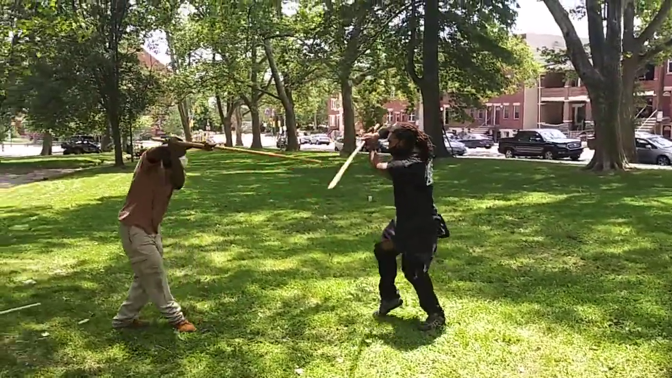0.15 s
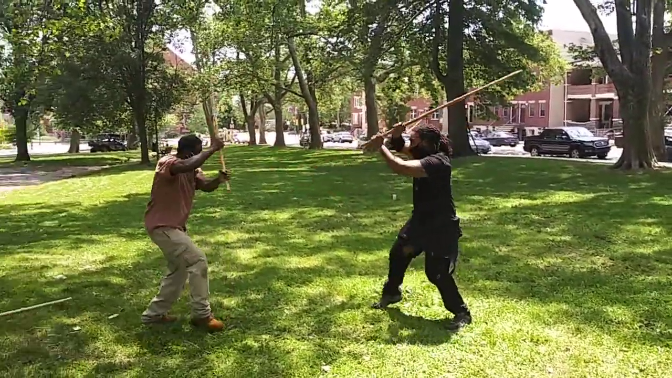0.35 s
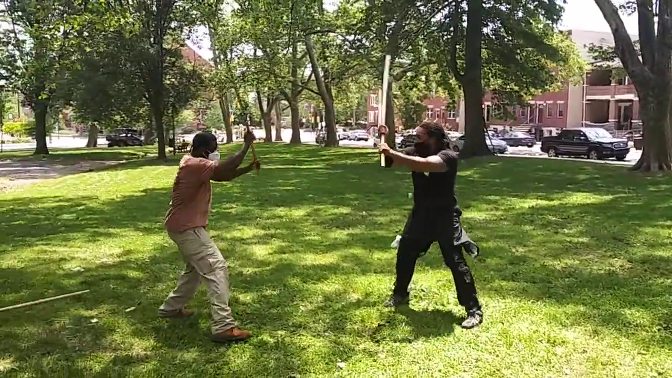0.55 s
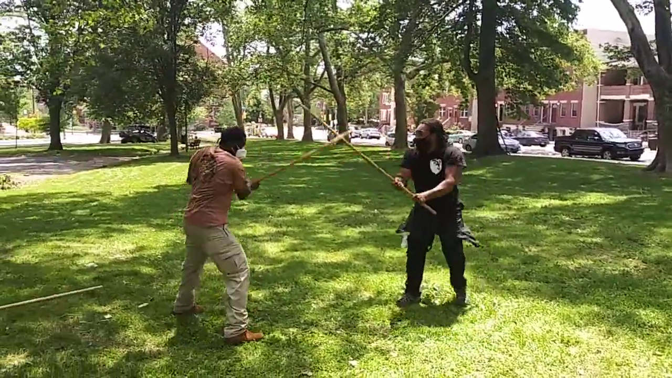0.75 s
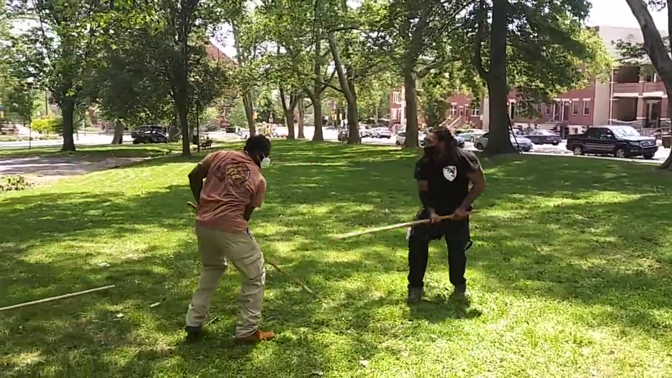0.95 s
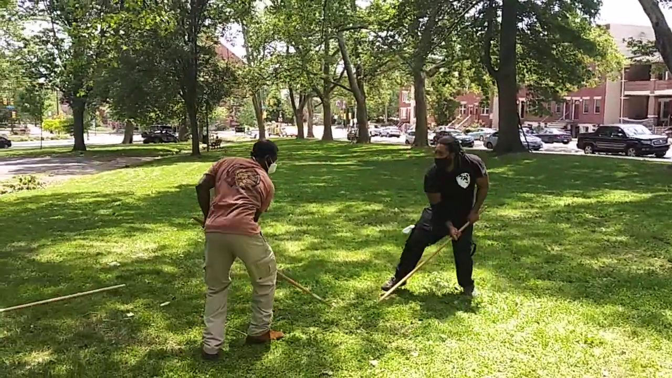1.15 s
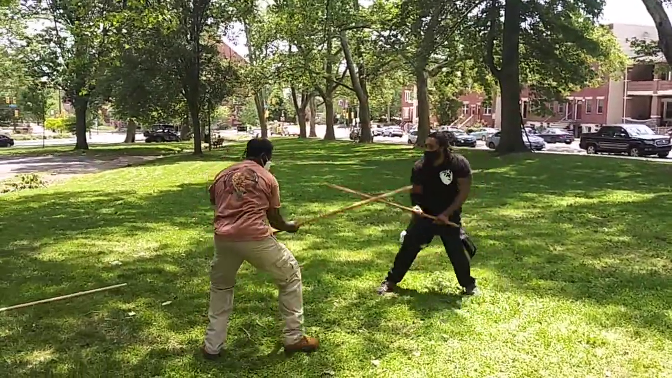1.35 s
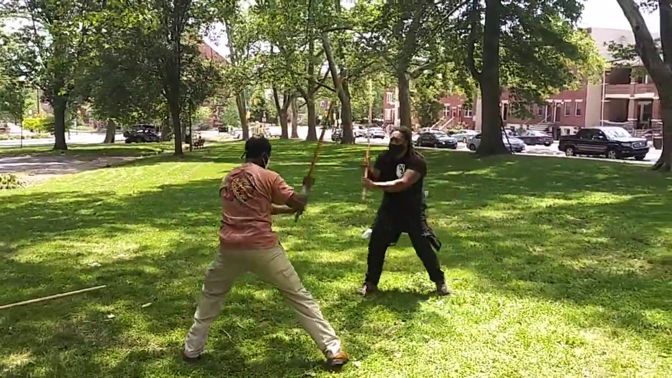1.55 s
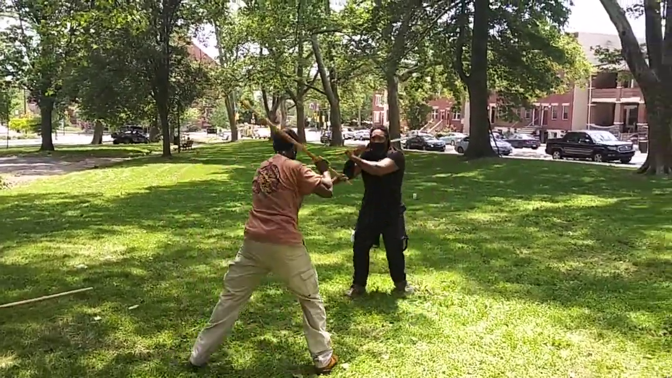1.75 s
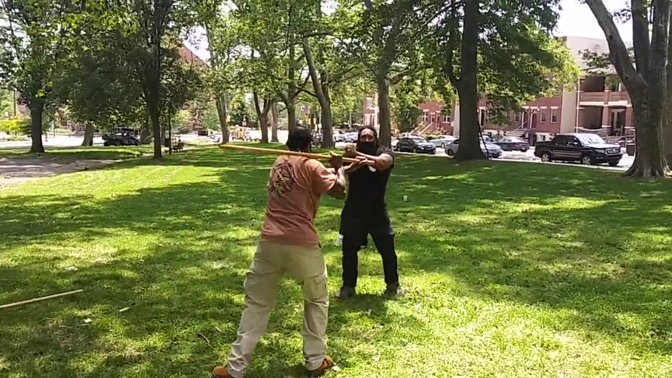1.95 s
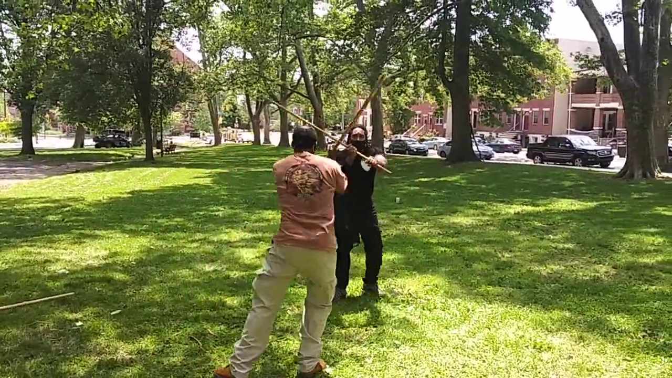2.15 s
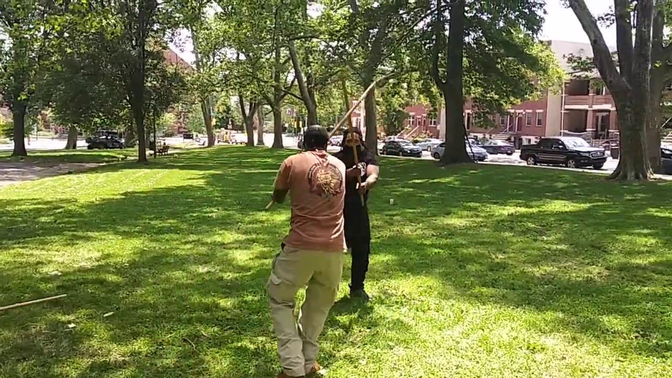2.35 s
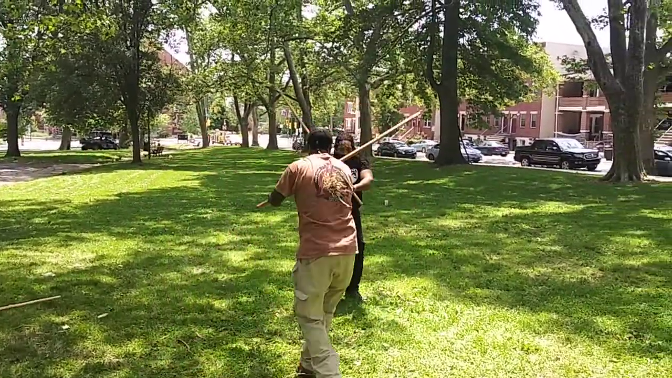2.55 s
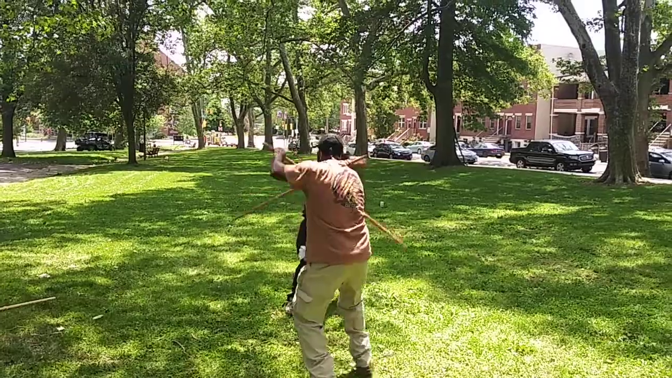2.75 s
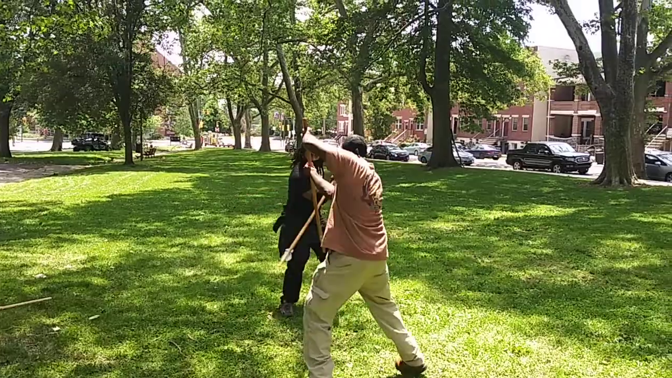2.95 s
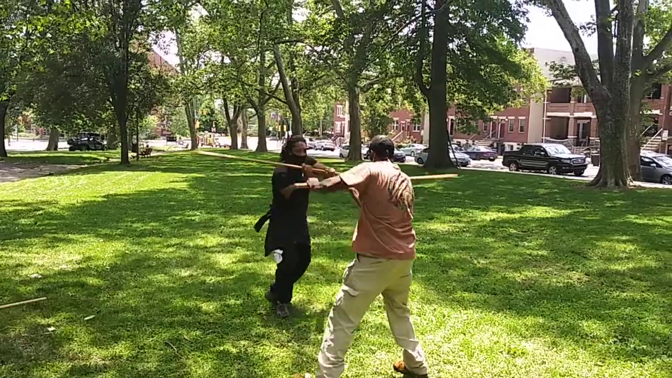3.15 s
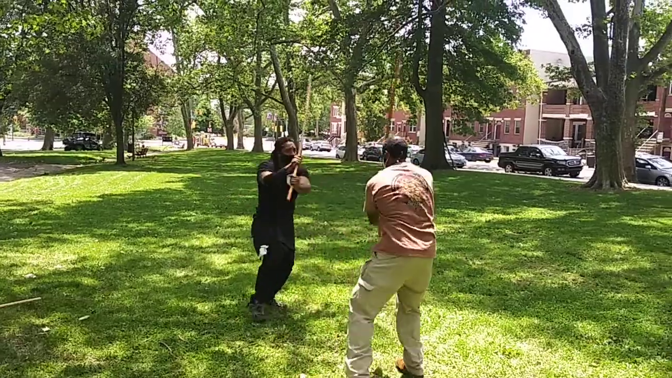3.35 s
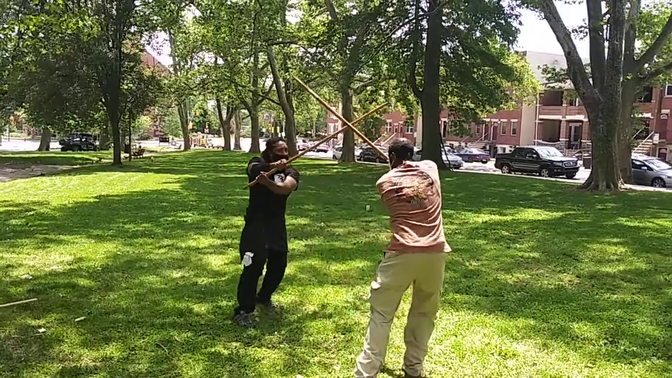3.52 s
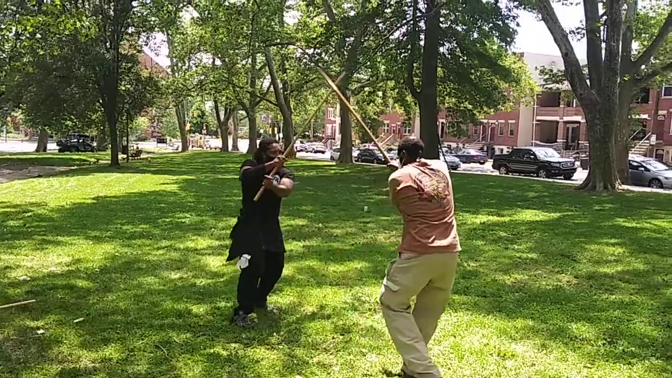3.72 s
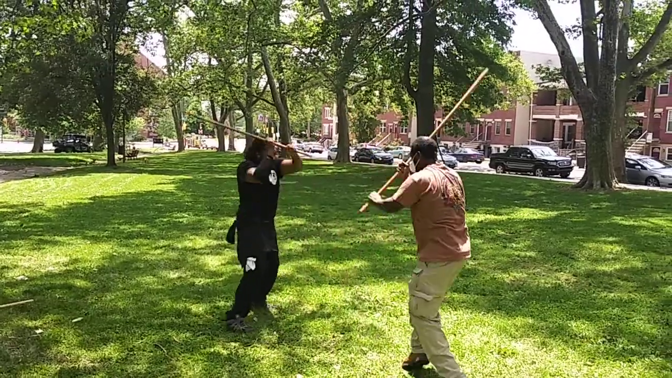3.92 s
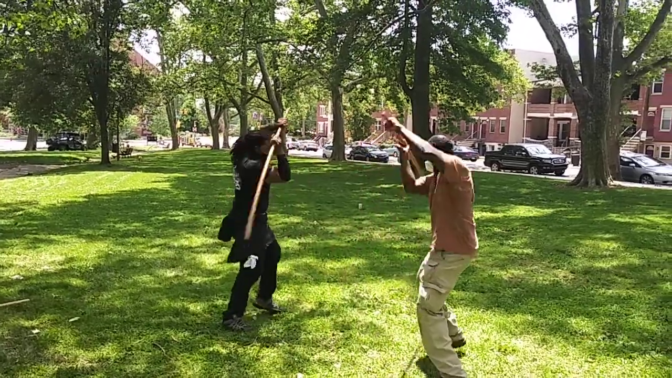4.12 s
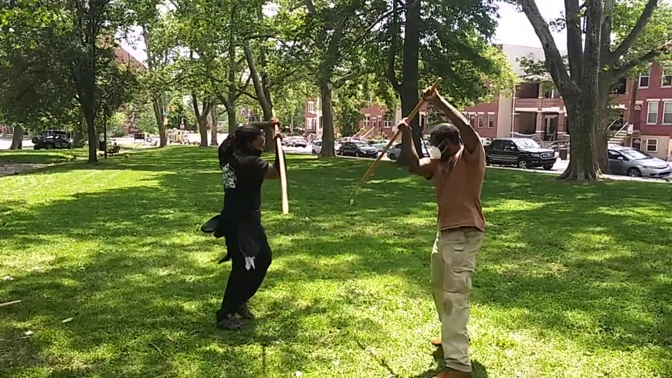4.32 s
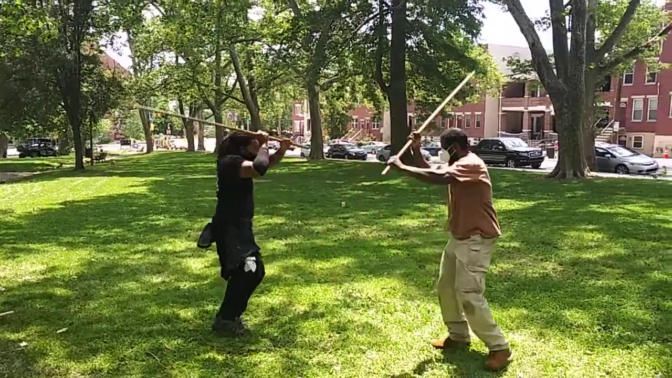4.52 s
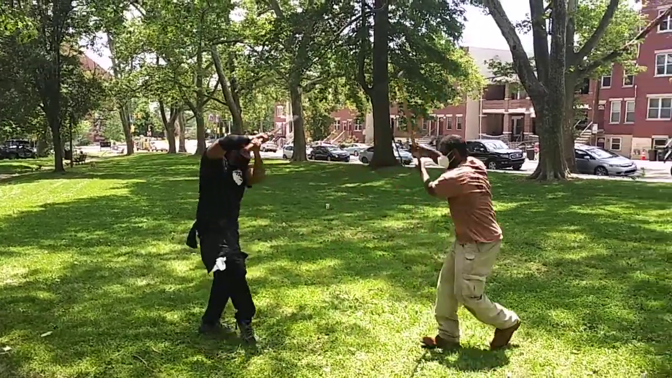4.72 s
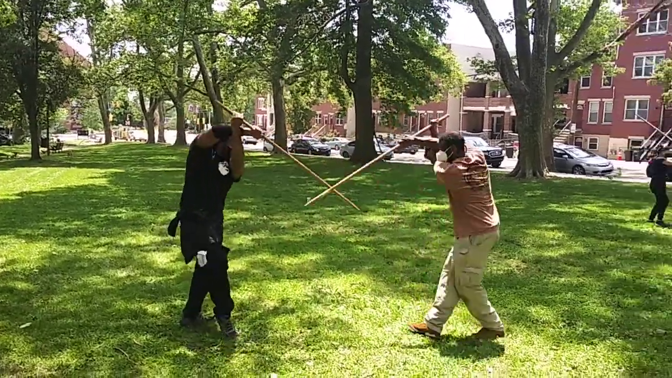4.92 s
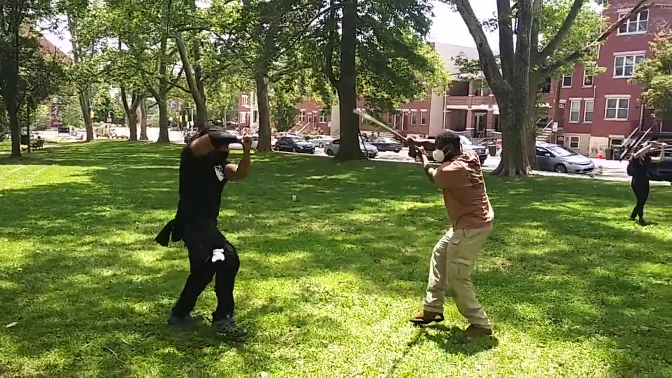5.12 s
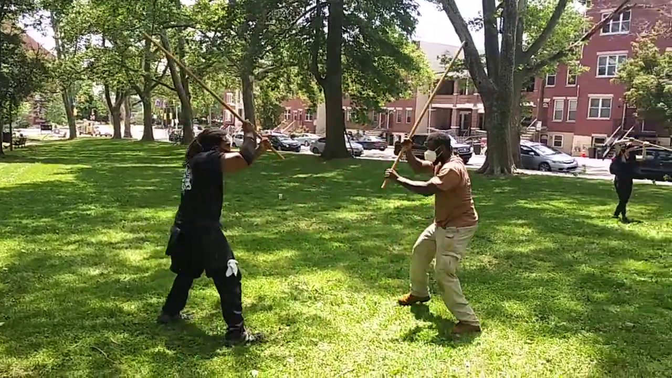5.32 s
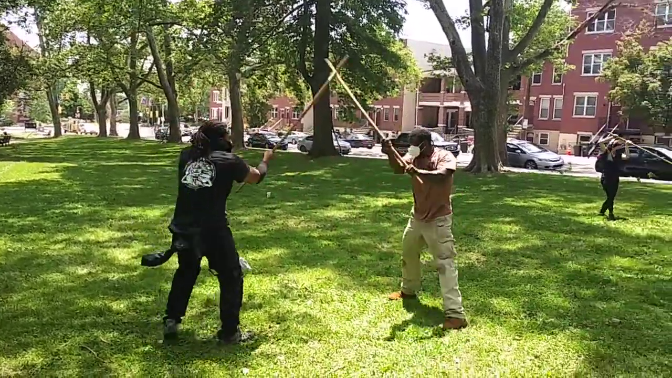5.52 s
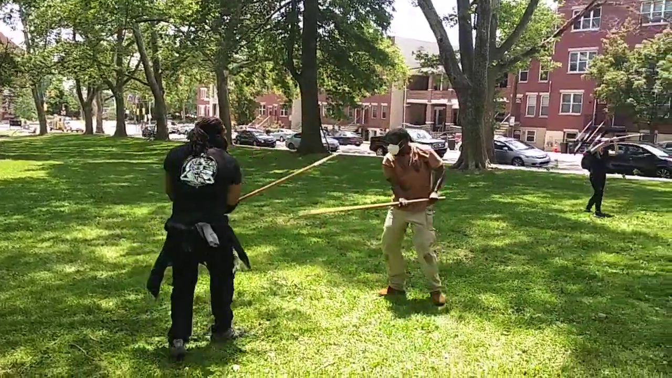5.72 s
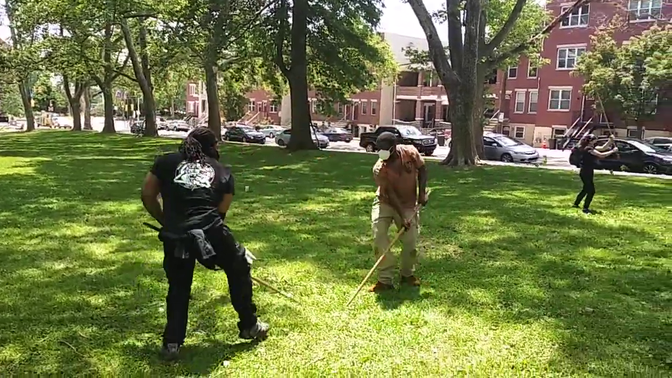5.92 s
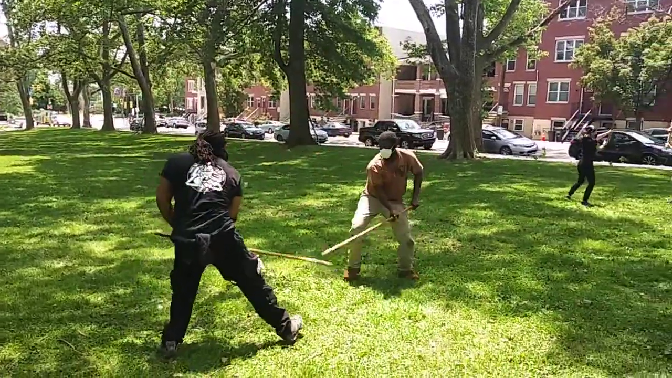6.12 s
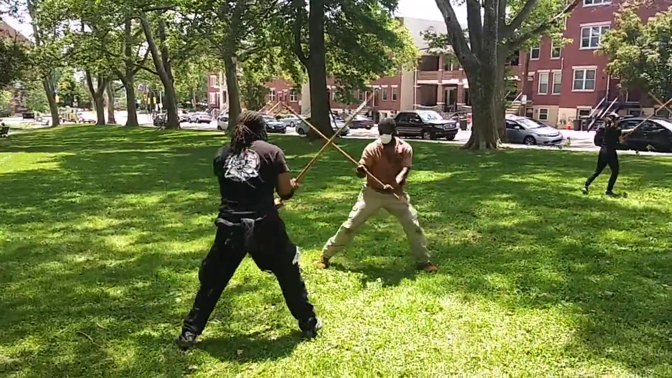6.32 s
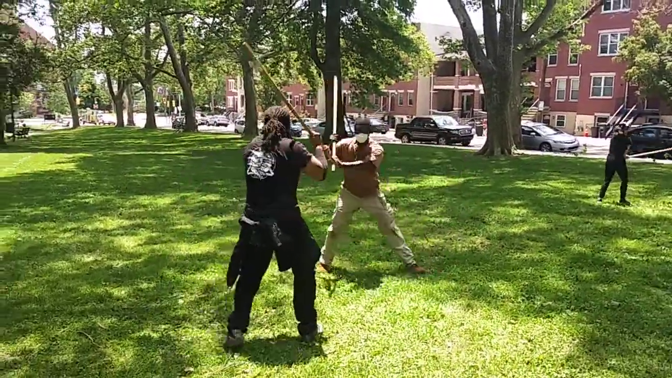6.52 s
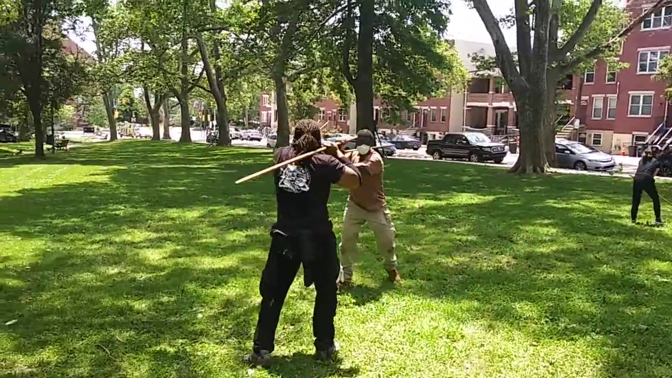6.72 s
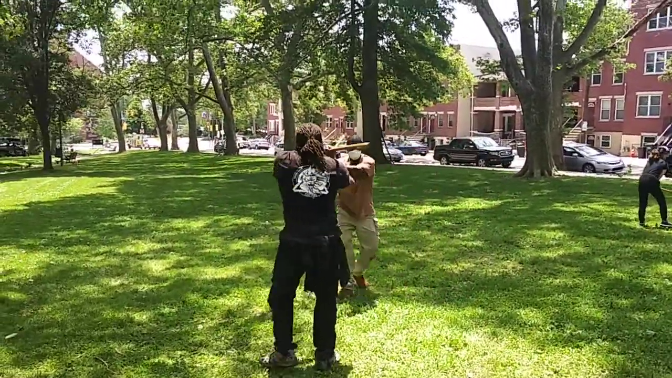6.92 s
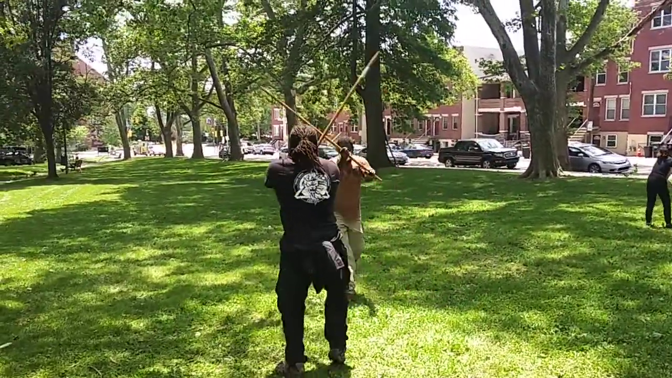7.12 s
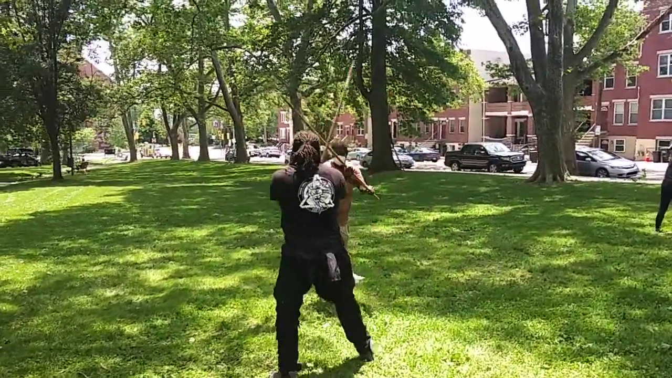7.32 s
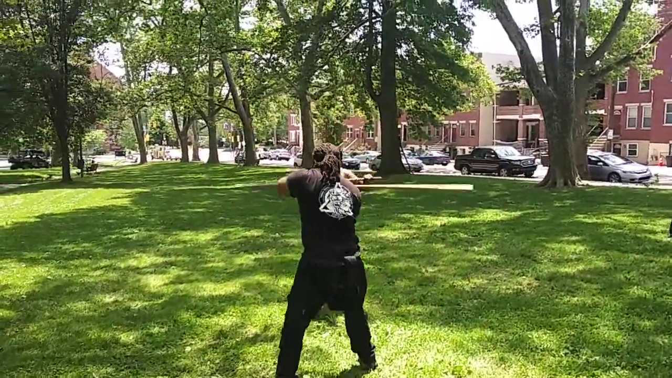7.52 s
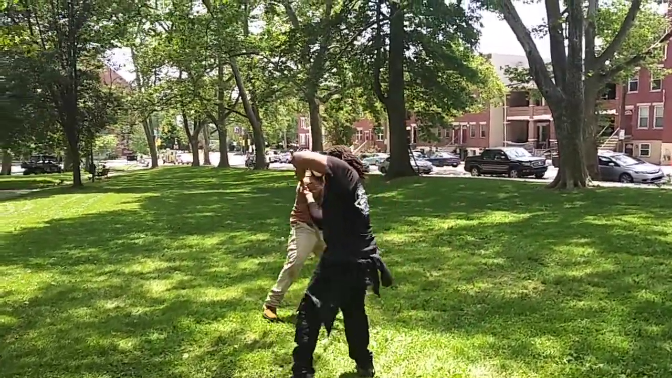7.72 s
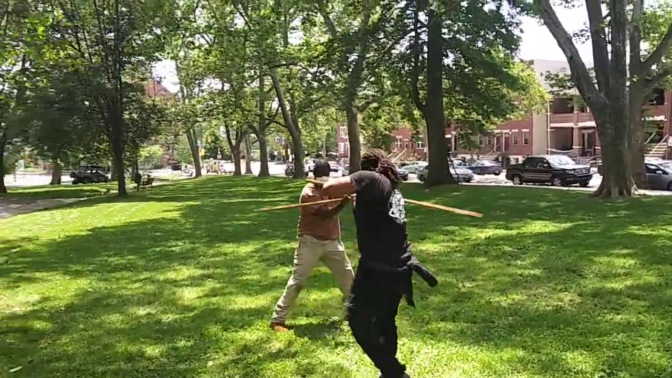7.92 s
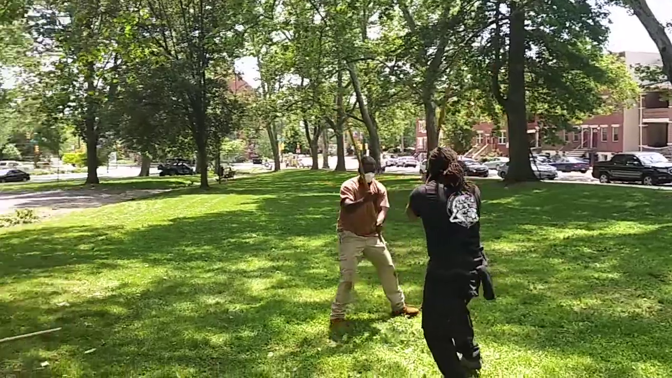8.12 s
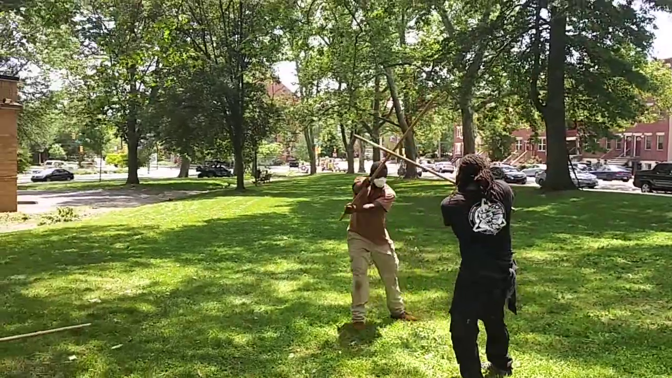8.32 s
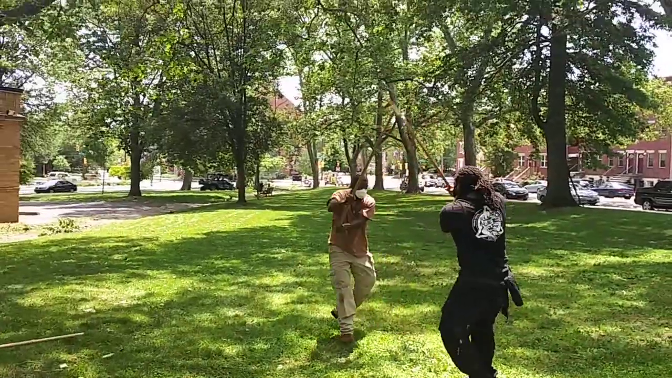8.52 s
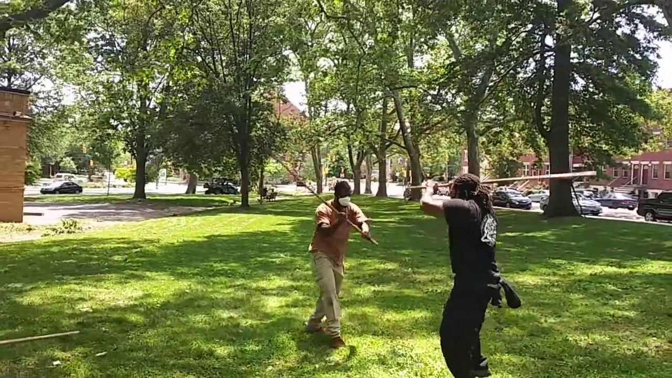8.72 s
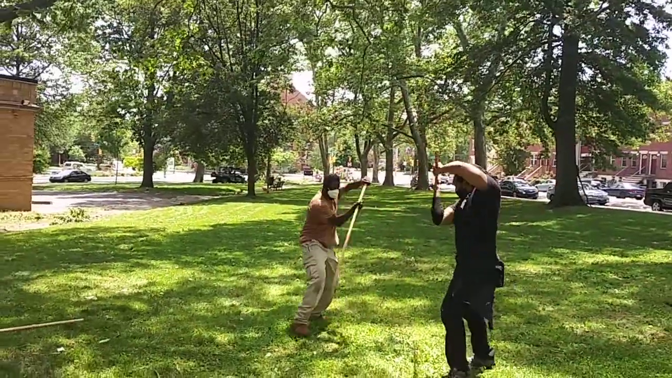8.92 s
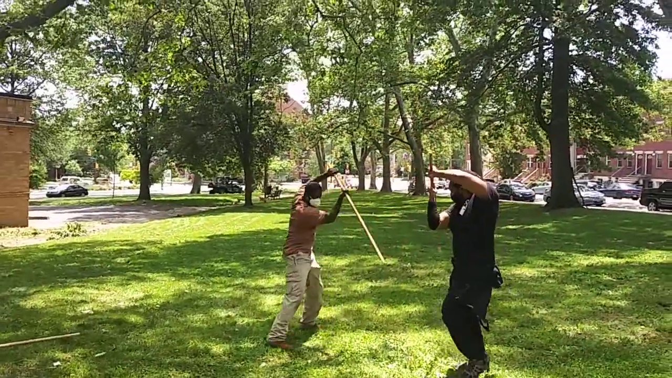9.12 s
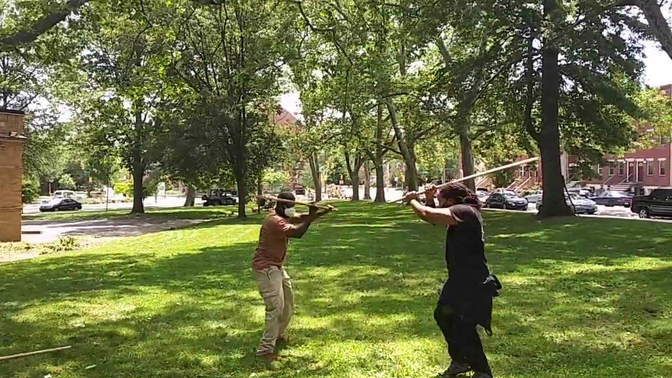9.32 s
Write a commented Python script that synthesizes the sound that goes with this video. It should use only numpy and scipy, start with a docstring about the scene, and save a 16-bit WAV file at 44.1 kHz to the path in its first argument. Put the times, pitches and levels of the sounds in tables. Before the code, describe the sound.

Outdoor stick sparring: hard dry wood-on-wood hits and lighter taps, with woody echoing tails in an open park above a low distant traffic hum.

```python
"""Two people spar with long wooden staffs on a park lawn, a few metres from a phone that overloads on hard blows.
Each clash is a crack plus the bending modes of both staffs, repeated once off the ground; filtered noise
builds the echoes from trunks and house fronts and the long scattered tail. Light parries touch again and sing.
Shaped noise makes the town, leaves and brushing shoes; two sines hum; a bird is a few blurred, gliding tones."""
import sys
import numpy as np
from scipy import signal
from scipy.fft import rfft, irfft, next_fast_len
from scipy.io import wavfile
from scipy.ndimage import uniform_filter1d, minimum_filter1d

SR = 44100
rng = np.random.default_rng(int(sys.argv[2]) if len(sys.argv) > 2 else 0)


def store_pcm(level_fs):
    """Save levels as 16-bit WAV."""
    pcm = np.round(np.clip(level_fs, -1, 1) * 32767).astype(np.int16)
    wavfile.write(sys.argv[1], SR, np.atleast_2d(pcm).T)


N = 412330  # length in samples

# broadband colour of the far town: pitch_hz, level_db
TOWN_COLOUR = [(15, -55), (25, -38), (58, -11), (80, 0.5), (115, 4), (170, 1), (516, -8), (936, -9.5),
               (1290, -10), (2690, -19.5), (3250, -20), (3620, -24), (4030, -20.5), (5880, -32.5),
               (7710, -22), (11000, -30.5), (16000, -41)]
# distant machinery: pitch_hz, level_db (mean, before it wavers)
MACHINE_HUM = [(71, -65), (99.7, -54.3)]
# clashes: start_s, force_db (relative), hardness_db_per_octave, favoured_pitch_hz, grip_tuning (ratio, before clipping),
# contact_one and contact_two (0-1 along each staff)
BLOWS = [(0.0929, -13, 0.2, 2320, 0.93, .205, .097), (0.7689, -4, 5, 1627, 1.03, .281, 0.36),
         (1.7335, -27, 3.5, 1380, 0.87, .52, .507), (2.3936, -4, 3, 1482, 0.96, .431, 0.52),
         (2.5774, -27.5, 2, 1404, 1.12, 0.28, 0.43), (2.9854, -7, 0, 1640, 0.91, .173, .04),
         (3.5531, -21.5, 5.5, 1673, 1.01, .489, .503), (3.6531, -3.5, 4, 1950, 0.9, .334, 0.41),
         (4.3157, -4, 2.5, 2090, 1.07, .46, 0.17), (4.489, -20.5, 1.5, 2220, 1.04, 0.23, .45),
         (4.9908, -8.5, 2.5, 1970, 0.92, .431, .197), (5.4432, -18, 0.1, 2363, 1.08, .183, .356),
         (5.6408, -1, 3, 1620, 0.93, .157, 0.44), (6.417, -24.5, 2.5, 2990, 1.09, .66, 0.1),
         (7.1927, -33.5, 3, 2794, 1, 0.09, 0.41), (7.1998, -34, 5.5, 3620, 0.82, .184, .053),
         (7.2816, -5.5, 0.9, 2270, .933, .209, .097), (7.8181, -8, 0, 1770, 1.006, .094, .229),
         (8.442, -4, 1.5, 3900, 1.074, .41, .192), (9.097, -12.5, 3, 1584, 0.92, .241, .436),
         (9.297, -20, 0, 2530, 0.81, 0.19, .051)]
# how strongly a struck staff radiates: pitch_hz, level_db
WOOD_RADIATION = [(150, -67), (500, -18.5), (1000, -2), (1600, 2.5), (2200, 3), (3000, -4.5), (4500, -3),
                  (8000, -18.5), (11000, -29)]
# crack of the crushed contact: pitch_hz, level_db
CRACK_COLOUR = [(200, -3), (1000, 13), (1800, -35), (4500, 0), (8000, 13), (14000, -26)]
# colour of the sound that the trees scatter back: pitch_hz, level_db
TREE_COLOUR = [(200, -27), (600, 2), (1000, -1.5), (1700, 0), (2500, 0), (3600, 2), (5500, -3), (8000, 6),
               (12000, 5.5)]
# echoes from trunks and house fronts: delay_s (mean), level_db (relative), smear_s
ECHOES = [(.047, -7.5, 0.0035), (.078, -11, 0.0024), (0.089, 2, 0.003), (0.104, -5.5, 0.0036),
          (.176, -16, .002), (0.216, -9, 0.0029), (.31, -11, 0.0027), (0.351, -19.5, 0.0038),
          (0.392, -23.5, 0.00098)]
# colour of those echoes: pitch_hz, level_db
ECHO_COLOUR = [(200, -33), (700, 6), (1100, 7), (1700, 4), (2500, 2), (3600, 6.5), (5500, -19.5),
               (8000, -2), (12000, -36)]
# whistles of a distant songbird: start_s, start_pitch_hz, end_pitch_hz, level_db
BIRD_NOTES = [(.21, 2260, 2620, -50), (0.371, 2230, 2650, -44), (.55, 2500, 2950, -52),
              (2.89, 3280, 3240, -58)]
# shoes and clothes brushing: start_s, level_db (relative), length_s (the swell peaks halfway)
BRUSHES = [(1.357, -51, 0.045), (2.171, -48, 0.0062), (3.415, -54, 0.052), (4.96, -43, 0.0036),
           (6.259, -36.5, 0.0035), (6.731, -45, 0.019), (7.495, -43, .0046), (8.696, -42, .0045)]
# colour of the brushing hiss: pitch_hz, level_db
BRUSH_COLOUR = [(1000, -30), (4000, 0), (6000, -6), (7800, 12), (9500, 1), (15000, -11)]
# frequency response of the phone: pitch_hz, level_db
PHONE_RESPONSE = [(20, -22), (70, -7.5), (140, -4.5), (7800, 1.5), (9300, -9), (12000, -11), (16000, -13)]

TOWN_DB = -42.5  # mean level, before it swells
STAFF_ONE_HZ, STAFF_TWO_HZ, SHEAR = 26, 28.6, .0053  # bending scale of each staff at grip ratio 1
LAWN_LAG_S, LAWN_DB = .0042, -9.5  # the bounce off the ground, relative to the direct sound
# tail and echo levels of a 0 dB blow, and the dB they gain per dB of force:
# light blows are choked less, so they carry well
TAIL_DB, ECHO_DB, CARRY = -20.5, -29.5, 0.65
# a blow duller than this (dB per octave) faces away from the phone and beams more upper ring at the trees
FACING_AWAY, BEAM_DB, BEAM_DB_PER_TILT = 0.3, 1.16, 9
PARRY_DB = -16  # weaker blows are parries
# parries touch again, with this delay, relative level and added dB per octave
REBOUND_S, REBOUND_DB, REBOUND_HARDNESS = .0335, -19.5, 2.5
# a parry struck near the middle of staff one sings on most
SING_HZ, SING_DB, SING_S = 1210, -16.5, 0.12
NOTE_S = .12  # length of a bird note
# faint footwork: rustles per second, mean level, spread of level, length
RUSTLES_PER_S, RUSTLE_DB, RUSTLE_SPREAD_DB, RUSTLE_S = 2.5, -58, 3, .07


def undb(db):
    """Decibels to gain."""
    return 10 ** (np.asarray(db) / 20)


def unit(x):
    """Scale to an rms of one."""
    return x / np.sqrt(np.mean(x ** 2))


def gain_at(hz, points):
    """Gain of a (pitch_hz, level_db) curve, straight on a log-frequency axis."""
    curve_hz, curve_db = np.transpose(points)
    return undb(np.interp(np.log(np.maximum(hz, 1)), np.log(curve_hz), curve_db))


def colour(x, points, size=2048):
    """Causal minimum-phase filter with the given curve, found by folding its cepstrum."""
    hz = np.arange(size // 2 + 1) * SR / size
    cepstrum = irfft(np.log(gain_at(hz, points)))
    cepstrum[1:size // 2] *= 2
    cepstrum[size // 2 + 1:] = 0
    impulse = irfft(np.exp(rfft(cepstrum)))
    return signal.fftconvolve(x, impulse)[:len(x)]


def shape(x, points):
    """Weight a sound by a curve without shifting its phase."""
    size = next_fast_len(len(x) + 2048)
    hz = np.arange(size // 2 + 1) * SR / size
    return irfft(rfft(x, size) * gain_at(hz, points), size)[:len(x)]


def clock(seconds):
    """Sample times from zero."""
    return np.arange(int(seconds * SR)) / SR


def add(track, start_s, sound):
    """Mix a sound into the track at its start time."""
    start = max(int(start_s * SR), 0)
    part = sound[:max(len(track) - start, 0)]
    track[start:start + len(part)] += part


def walk(rate):
    """Smooth random wander with a spread near one, drawing `rate` new values per second."""
    hold = int(SR / rate)
    steps = np.repeat(rng.standard_normal(N // hold + 1), hold)
    smooth = uniform_filter1d(uniform_filter1d(steps, hold), hold)
    return unit(smooth)[:N]


def machine_hum():
    """Steady rotation heard as sines that waver slowly in level and phase."""
    t = np.arange(N) / SR
    hum = np.zeros(N)
    for pitch_hz, level_db in MACHINE_HUM:
        level = undb(level_db + 1.5 * walk(5))
        hum += level * unit(np.sin(2 * np.pi * pitch_hz * t + .5 * walk(6)))
    return hum


def town(swell_db=1.92):
    """Far traffic as swelling noise, a machine hum, and a top hiss of leaves that comes and goes."""
    air = unit(shape(rng.standard_normal(N), TOWN_COLOUR)) * undb(TOWN_DB + swell_db * walk(3.54))
    leaves = signal.sosfiltfilt(signal.butter(4, 6000, "high", fs=SR, output="sos"), air)
    stirring = undb(2.2 * walk(6) + 1.2 * walk(25))
    return air + leaves * (stirring - 1) + machine_hum()


def staff(t, base_hz, place, hardness_db, accent_hz, t60=0.033, treble_damping=0.53, accent_db=7,
          free_db=-33, free_t60=0.04):
    """Bending modes of a hand-held rod; those with a node at the contact point stay silent."""
    halfwaves = np.arange(2, 30) + .5
    # shear crowds the high modes together
    hz = base_hz * halfwaves ** 2 / np.sqrt(1 + SHEAR * halfwaves ** 2)
    bend = np.sin(np.pi * (halfwaves * place - .25))
    octave = np.log2(hz / 1600)
    accent = np.exp(-(np.log2(hz / accent_hz) / .22) ** 2)
    size = bend * gain_at(hz, WOOD_RADIATION) * undb(hardness_db * octave + accent_db * accent)
    # both decay times hold at 1600 Hz; higher modes die sooner
    loss = np.log(1000) * 2 ** (treble_damping * octave[:, None]) * t
    # the hands choke most of the ring at once; a little of it sings on
    fade = np.exp(-loss / t60) + undb(free_db) * np.exp(-loss / free_t60)
    return size @ (np.sin(2 * np.pi * hz[:, None] * t) * fade)


def clash(hardness_db, accent_hz, grip, place_one, place_two, crack_db=-12, crack_s=0.0062, thin_hz=420):
    """Both staffs ring with a brief crack; the grip retunes them and the contact favours one pitch."""
    t = clock(.16)
    grip = np.clip(grip, .85, 1.15)
    crack = unit(colour(rng.standard_normal(len(t)), CRACK_COLOUR)) * np.exp(-t / crack_s)
    one = staff(t, grip * STAFF_ONE_HZ, place_one, hardness_db, accent_hz)
    two = staff(t, grip * STAFF_TWO_HZ, place_two, hardness_db, accent_hz)
    # a thin rod moves little air at low pitch
    thin = signal.butter(2, thin_hz, "high", fs=SR, output="sos")
    return signal.sosfilt(thin, one + two + undb(crack_db) * crack)


def scatter(ring, bloom_db, t60=1.422, treble_t60=0.84, build_s=0.024):
    """Countless weak returns from trunks and leaves; the treble dies first."""
    t = clock(1.3)
    # sound sent out in all directions averages the modes into a broad woody wash
    wash = unit(shape(rng.standard_normal(len(t)), WOOD_RADIATION))
    modes = unit(signal.fftconvolve(rng.standard_normal(len(t)), ring, "same"))
    # the angle of the staffs decides how much of the upper ring is beamed at the trees
    bloom = [(2400, 0), (3100, bloom_db), (4100, bloom_db), (5000, 0)]
    noise = unit(shape(shape(wash + 1.7 * modes, TREE_COLOUR), bloom))
    low = signal.sosfilt(signal.butter(1, 3500, fs=SR, output="sos"), noise)
    returns = low * undb(-60 * t / t60) + (noise - low) * undb(-60 * t / treble_t60)
    # returns arrive in clumps, trunk by trunk
    clumps = undb(1.6 * walk(220)[:len(t)] + 1.2 * walk(60)[:len(t)])
    build_up = 1 - np.exp(-(t / build_s) ** 2)
    return returns * clumps * build_up


def echo(ring, smear_s):
    """One dulled return from a rough surface, drawn out over a few milliseconds."""
    t = clock(.03)
    surface = rng.standard_normal(len(t)) * t * np.exp(-2 * t / smear_s)
    return unit(signal.fftconvolve(colour(ring, ECHO_COLOUR), surface))


def tone(start_hz, end_hz, length, blur_s=0.038):
    """A swelling, gliding tone, blurred by its way through the trees."""
    t = clock(length)
    hz = start_hz + (end_hz - start_hz) * t / length
    swell = np.sin(np.pi * t / length)
    clean = swell * np.sin(2 * np.pi * np.cumsum(hz) / SR)
    paths = rng.standard_normal(len(t)) * np.exp(-t / blur_s)
    blurred = swell * signal.fftconvolve(clean, paths)[:len(t)]
    flutter = undb(2 * walk(75)[:len(t)])
    return unit(unit(clean) / 2 + unit(blurred)) * flutter


def sparring(direct_db=2, wander_s=.0008):
    """Every clash arrives directly, off the lawn, through the trees and as echoes; parries rebound and sing."""
    out = np.zeros(N)
    for start_s, force_db, hardness_db, accent_hz, grip, place_one, place_two in BLOWS:
        ring = clash(hardness_db, accent_hz, grip, place_one, place_two)
        near = undb(force_db + direct_db) * ring
        add(out, start_s, near)
        add(out, start_s + LAWN_LAG_S, undb(LAWN_DB) * near)

        carried_db = CARRY * force_db
        bloom_db = BEAM_DB + BEAM_DB_PER_TILT * max(FACING_AWAY - hardness_db, 0)
        add(out, start_s, undb(TAIL_DB + carried_db) * scatter(ring, bloom_db))
        for delay_s, level_db, smear_s in ECHOES:
            # each path length varies a little from blow to blow
            arrival_s = start_s + delay_s + wander_s * rng.standard_normal()
            add(out, arrival_s, undb(ECHO_DB + carried_db + level_db) * echo(ring, smear_s))

        if force_db < PARRY_DB:
            touch = clash(hardness_db + REBOUND_HARDNESS, accent_hz, grip, place_one, place_two)
            add(out, start_s + REBOUND_S, undb(force_db + REBOUND_DB) * touch)
            middle = np.sin(np.pi * place_one) ** 4  # one at mid-staff, zero at the ends
            add(out, start_s, middle * undb(force_db + SING_DB) * tone(SING_HZ, SING_HZ, SING_S))
    return out


def bird():
    """Short gliding whistles from the trees."""
    out = np.zeros(N)
    for start_s, start_hz, end_hz, level_db in BIRD_NOTES:
        add(out, start_s, undb(level_db) * tone(start_hz, end_hz, NOTE_S))
    return out


def brush(length, grain_db=4):
    """Grass or cloth: grainy hiss that swells and fades."""
    t = clock(.8)
    grains = rng.standard_normal(len(t)) * undb(grain_db * rng.standard_normal(len(t)))
    swell = 2 * t / length * np.exp(1 - 2 * t / length)
    return swell * unit(colour(grains, BRUSH_COLOUR))


def brushes(brush_db=4):
    """A few clear scuffs and flicks among the faint rustles of the footwork."""
    out = np.zeros(N)
    for start_s, level_db, length_s in BRUSHES:
        add(out, start_s, undb(level_db + brush_db) * brush(length_s))
    for step in range(int(RUSTLES_PER_S * N / SR)):
        start_s = (step + rng.random()) / RUSTLES_PER_S
        level_db = RUSTLE_DB + RUSTLE_SPREAD_DB * rng.standard_normal()
        add(out, start_s, undb(level_db) * brush(RUSTLE_S))
    return out


def scene():
    """The sparring pair in the park, as one channel."""
    return (town() + sparring() + bird() + brushes())[None]


def limit(x, full_scale=0.8, size=60):
    """Peak limiter: the gain dips for a few milliseconds around anything above full scale."""
    gain = np.minimum(1, full_scale / (np.abs(x) + 1e-9))
    return x * uniform_filter1d(minimum_filter1d(gain, size), size)


def record(dry):
    """The microphone saturates on hard blows; the phone colours the sound, limits the peaks and cuts the top."""
    ceiling = .85
    saturated = ceiling * np.tanh(dry[0] / ceiling)
    heard = limit(shape(saturated, PHONE_RESPONSE))
    top_cut = signal.ellip(8, .05, 60, 16300, fs=SR, output="sos")  # low-pass, edge in Hz
    return signal.sosfiltfilt(top_cut, heard)[None]


dry = scene()
out = record(dry)
store_pcm(out)
```